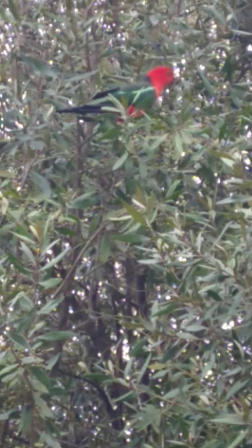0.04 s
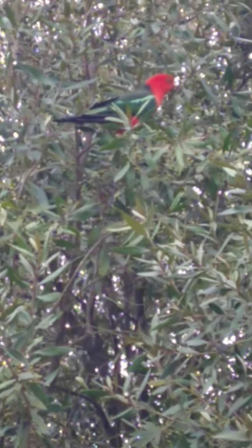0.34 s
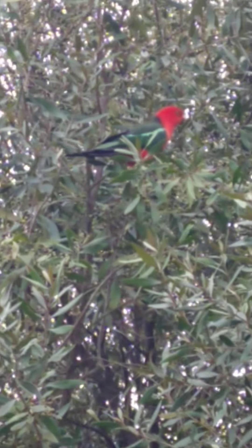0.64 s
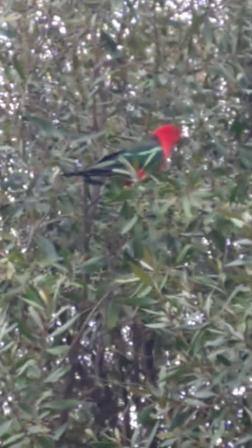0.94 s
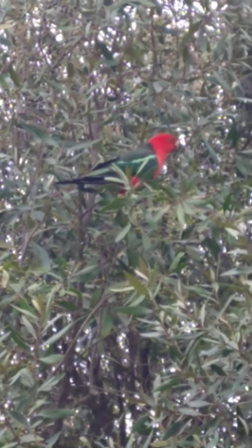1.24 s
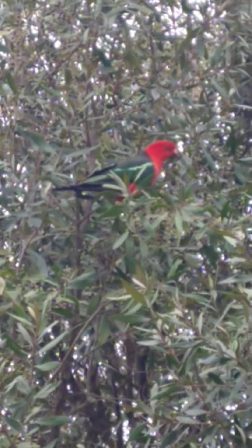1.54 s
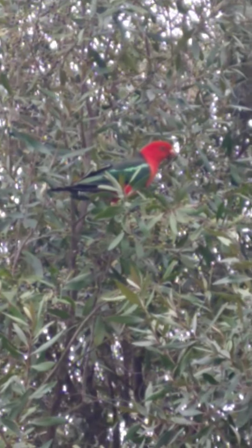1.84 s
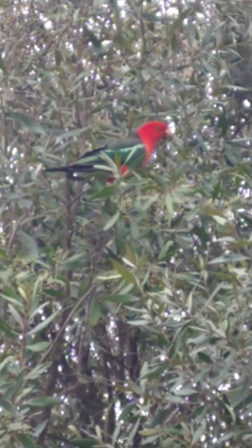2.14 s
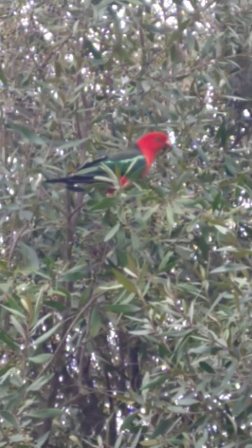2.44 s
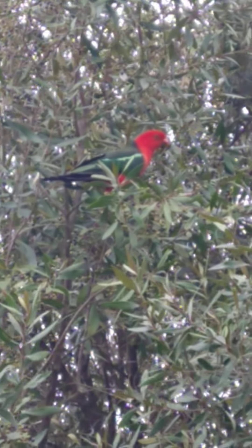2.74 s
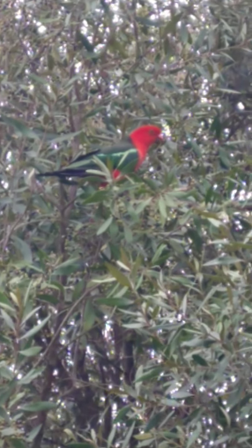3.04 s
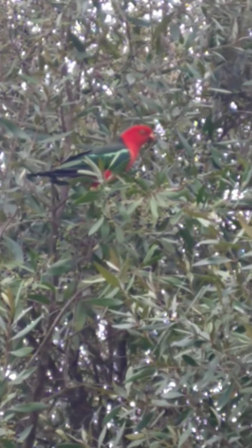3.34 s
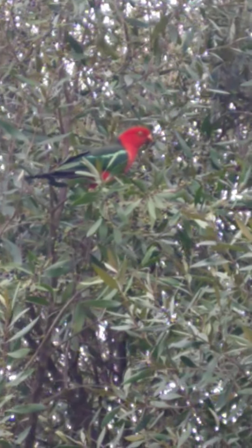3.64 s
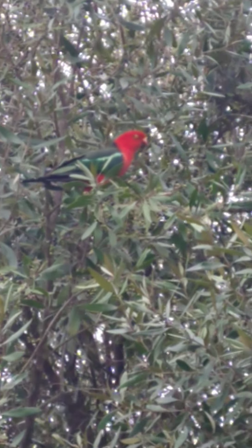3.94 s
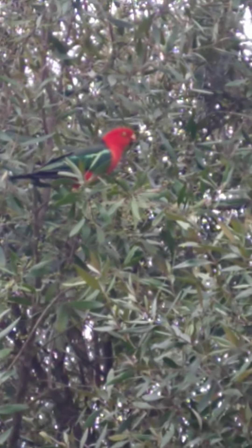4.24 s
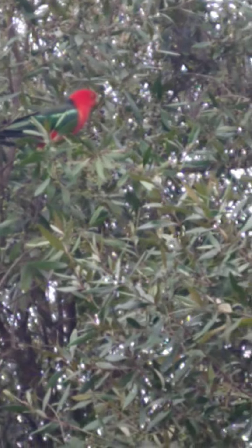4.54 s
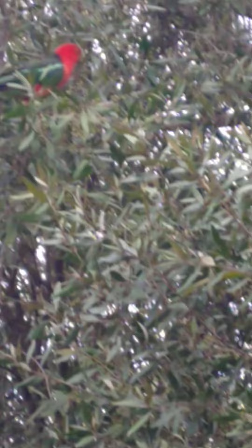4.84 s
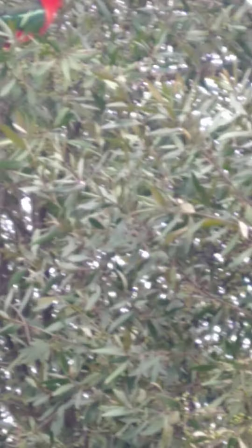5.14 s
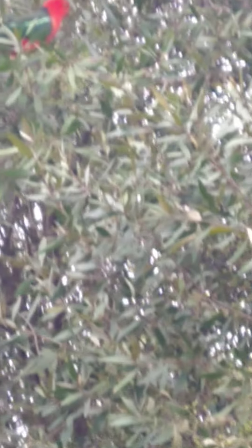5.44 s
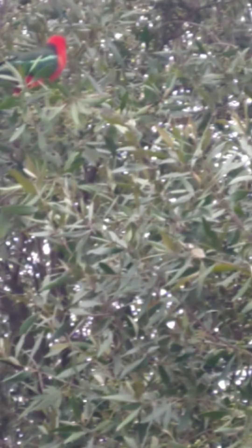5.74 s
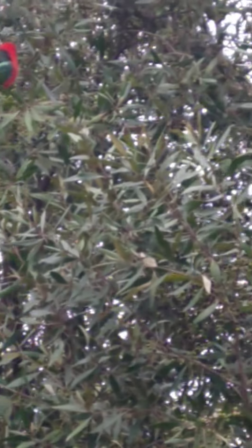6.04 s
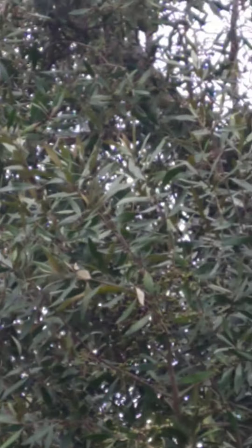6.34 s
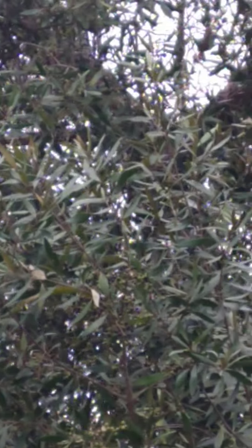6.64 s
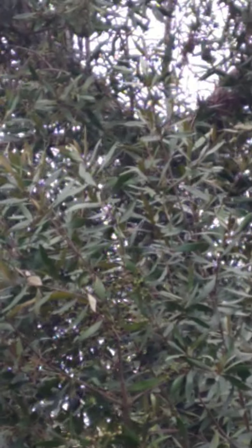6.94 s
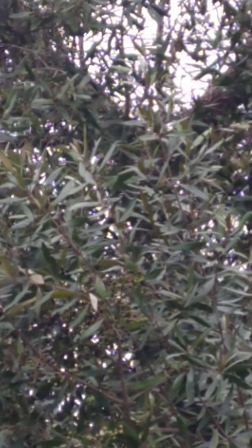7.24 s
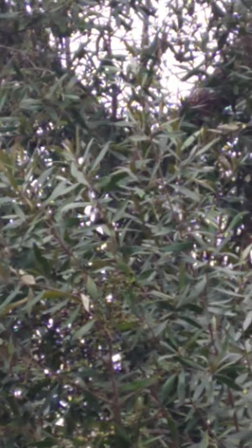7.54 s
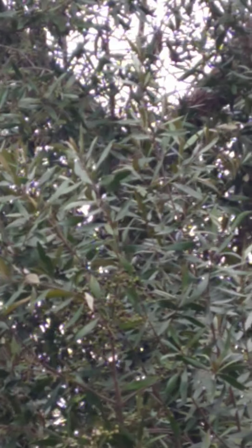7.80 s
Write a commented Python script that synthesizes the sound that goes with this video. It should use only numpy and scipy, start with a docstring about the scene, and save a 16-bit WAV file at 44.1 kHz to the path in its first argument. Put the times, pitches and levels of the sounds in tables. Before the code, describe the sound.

Distant engines drone and cars pass with a swelling tyre roar while parrots and small birds chirp faintly among rustling leaves.

```python
"""Among trees, some way from a road. From the start one engine hums, eases off once, then pulls steadily
up through its revs, while a second, raspier one drones and slowly fades. Leaves hiss, wind puffs, distant
birds echo faintly, and twigs snap now and then. Parrots soon chatter in short bouts. Tyre roar swells as
each car goes by, loudest near the end, when a small bird sets in with a thin, high trill."""
import sys
import numpy as np
from scipy import signal
from scipy.fft import rfft, irfft, next_fast_len
from scipy.io import wavfile
from scipy.ndimage import uniform_filter1d

SR = 44100
rng = np.random.default_rng(int(sys.argv[2]) if len(sys.argv) > 2 else 0)


def unload_wav(signal):
    """Save mono or channel-first audio to the path in sys.argv[1] as 16-bit WAV at rate SR, clipped to [-1, 1]."""
    wavfile.write(
        sys.argv[1],
        SR,
        np.round(np.clip(np.atleast_2d(signal).T, -1, 1) * 32767).astype(np.int16),
    )


N = 347067
TIME = np.arange(N) / SR
ROAD_LAG_S, BIRD_LAG_S = 0.00018, .00003  # how much later the left ear hears them


def from_db(db):
    """Turn decibels into a number to multiply a sound by."""
    return 10 ** (np.asarray(db) / 20)


def rms_one(x):
    """Scale a sound so that its average strength (rms) is 1."""
    return x / np.sqrt(np.mean(x ** 2) + 1e-20)


def in_time(rows):
    """Join the rows of a table with straight lines: one curve in time for each column after the first."""
    times, *columns = np.transpose(rows)
    return [np.interp(TIME, times, column) for column in columns]


def at_hz(points, hz):
    """Look up a table's value at any frequency."""
    table_hz, values = np.transpose(points)
    return np.interp(np.log(hz), np.log(table_hz), values)


def drift(rate_hz):
    """A smooth random wobble, about 1 in size."""
    step, warm_up = 40, 2000  # one value every 40 samples; the first 2000 values are skipped
    keep = np.exp(-2 * np.pi * step * rate_hz / SR)
    noise = rng.standard_normal(N // step + warm_up + 2)
    slow = signal.lfilter([1], [1, -2 * keep, keep * keep], noise)[warm_up:]
    return np.interp(np.arange(N) / step, np.arange(len(slow)), rms_one(slow))


def band(x, low_hz, high_hz):
    """Keep the part of a sound between two frequencies."""
    sos = signal.butter(2, [low_hz, min(high_hz, .45 * SR)], "band", fs=SR, output="sos")
    return signal.sosfilt(sos, x + 1e-18)


def from_right(x, lag_s):
    """Sound from the right reaches the left ear a little later."""
    left, right = np.broadcast_to(x, (2, N))
    return np.array([np.interp(TIME - lag_s, TIME, left), right])


def add(out, s, sound, pan_db):
    """Add a short sound at s seconds; a pan above zero makes it louder on the left."""
    at = round(s * SR)
    sound = sound[:max(N - at, 0)]
    out[:, at:at + len(sound)] += sound * from_db([[pan_db / 2], [-pan_db / 2]])


def surge(peak_s, db, rise_db_per_s, fall_db_per_s):
    """A volume curve that climbs to a peak and dies away."""
    return from_db(db - np.maximum((peak_s - TIME) * rise_db_per_s, (TIME - peak_s) * fall_db_per_s))


def together(gains):
    """Combine volume curves: unrelated sounds add in power, so add their squares."""
    return np.sqrt(sum(np.square(gain) for gain in gains))


def tone(hz, rough, flutter_hz):
    """A tone that follows a pitch curve; moving air and many paths make its level and phase wander."""
    phase = (2 * np.pi * ((np.cumsum(hz) / SR + rng.random()) % 1)).astype(np.float32)
    wavering = (1 + rough * drift(flutter_hz)) * np.cos(phase)
    return rms_one(wavering + rough * drift(flutter_hz) * np.sin(phase))


def climbing_engine():
    """Tones at multiples of the engine's speed; each booms as it crosses a pitch the exhaust rings at."""
    # turns of the crankshaft each second: t/s, f/Hz
    speed = [(0, 45.1), (.55, 46.6), (.72, 46.83), (1, 43.81), (1.3, 43.03), (2.5, 44.63), (3, 46.54),
             (3.5, 48.61), (3.95, 49.27), (4.4, 50.06), (4.9, 52.09), (6.4, 56.77), (7.2, 57.97),
             (7.87, 59.6)]
    # how well the strong tones get through the trees: t/s, level/dB
    carry = [(0, 7), (.7, 5), (1.7, 4.5), (3, -1), (5.5, 2.1), (7.2, -0.5), (7.5, -2.5), (7.87, -5.5)]
    # strong tones: multiple of the speed, level/dB
    strong_tones = [(2, -6), (3, -5.5), (4, 7.5), (6, 5.5), (8, -10)]
    # where the exhaust rings: f/Hz, width/Hz, level/dB
    exhaust = [(95.3, 21.5, -42), (134.1, 17.4, -45), (203.5, 13.45, -60), (242.3, 9.15, -47.5),
               (311, 21.4, -61), (345.9, 14.8, -43), (379.8, 21.5, -38)]
    # weak higher tones: multiple of the speed, level/dB
    weak_tones = [(5, -64.5), (5.5, -67.5), (6.5, -66), (7, -57), (9, -68)]
    crank_hz, = in_time(speed)
    carry_db, = in_time(carry)
    hum = 0
    for multiple, tone_db in strong_tones:
        hz = multiple * crank_hz
        boom = sum(from_db(db) / (1 + (2 * (hz - centre) / width) ** 2) for centre, width, db in exhaust)
        hum = hum + from_db(tone_db) * boom * tone(hz, rough=.14, flutter_hz=2.7)
    overtones = sum(from_db(db) * tone(k * crank_hz, rough=.5, flutter_hz=4.2) for k, db in weak_tones)
    return from_db(carry_db) * hum + overtones


def droning_engine():
    """A firing hum; swells bring up rough higher tones and gas puffs that ring in the silencer."""
    # crankshaft speed and the tones at 2 and 5 times it: t/s, f/Hz, firing level/dB, fifth level/dB
    drone = [(0, 42, -51, -52), (.7, 41.1, -49, -55), (1.2, 41.1, -49, -64), (2.3, 42.15, -51, -62),
             (3.6, 42.7, -53, -65), (5.4, 41, -60, -68), (6.3, 40.2, -54, -68), (7.87, 39, -59, -66)]
    # swells of the rasp: peak t/s, level/dB, rise/(dB/s), fall/(dB/s)
    swells = [(.02, -31, 1, 28.5), (.36, -41, 72, 18), (.72, -37.5, 63, 13), (2.27, -37.5, 37, 15.5),
              (2.7, -43, 70, 11), (3.32, -46.5, 35, 36), (6.6, -46.5, 18, 11.5)]
    # tones of the rasp: multiple of the speed, level/dB
    rasp_tones = [(7, -15), (8, -12), (9, -7), (10, -4.5), (11, -10.5), (12, -11), (14, -20.5)]
    # where the silencer rings: f/Hz, width/Hz, level/dB
    silencer = [(365, 36.4, 6.5), (405, 71, -5), (484, 28, 2.5)]
    crank_hz, firing_db, fifth_db = in_time(drone)
    swelling = together(surge(*one_swell) for one_swell in swells)
    # this clean tone throbs against the other engine's while the two are a few hertz apart
    firing = from_db(firing_db) * tone(2 * crank_hz, rough=.12, flutter_hz=4)
    fifth = from_db(fifth_db) * tone(5 * crank_hz, rough=.3, flutter_hz=4)
    rasp = sum(from_db(db) * tone(k * crank_hz, rough=.27, flutter_hz=5) for k, db in rasp_tones)
    pulsing = 1 + 1.02 * np.cos(4 * np.pi * np.cumsum(crank_hz) / SR)  # two puffs a turn
    puffs = rng.standard_normal(N) * pulsing
    gas = sum(from_db(db) * band(puffs, hz - width / 2, hz + width / 2) * (-1) ** k
              for k, (hz, width, db) in enumerate(silencer))
    return firing + fifth + swelling * (rasp + from_db(-4.5) * rms_one(gas))


def noise_line(hz, width_hz):
    """A narrow band of noise around a pitch curve, heard as a breathy hum."""
    lowpass = signal.butter(2, width_hz / 2, fs=SR, output="sos")
    smear = signal.sosfilt(lowpass, rng.standard_normal((2, N)))
    phase = (2 * np.pi * (np.cumsum(hz) / SR % 1)).astype(np.float32)
    return rms_one(smear[0] * np.cos(phase) + smear[1] * np.sin(phase))


def wash(spectrum, waver_db):
    """Wavering stereo noise, part straight from the road's side and part scattered by the trees."""
    # how alike the two ears hear it: f/Hz, likeness from 0 to 1
    likeness = [(40, .7), (150, 0.91), (400, .98), (700, 1), (1100, 0.85), (1600, 0.95), (2500, .85),
                (4000, .35), (8000, 0), (15000, 0.5)]
    size = next_fast_len(N)
    hz = np.maximum(np.arange(size // 2 + 1) * SR / size, 1)
    direct, *scattered = rfft(rng.standard_normal((3, size)))
    alike = np.clip(at_hz(likeness, hz), 0, .98)
    lag_phase = 2 * np.pi * hz * ROAD_LAG_S
    ears = np.sqrt(alike) * direct * np.exp(-1j * lag_phase * [[1], [0]])
    ears += np.sqrt(1 - alike) * np.array(scattered)
    fade_ends = 1 / (1 + (spectrum[0][0] / hz) ** 4) / (1 + (hz / spectrum[-1][0]) ** 8)
    overlap = np.sqrt(1 + alike * np.cos(lag_phase))  # how the two ears add up or cancel when mixed
    noise = irfft(ears * fade_ends * from_db(at_hz(spectrum, hz)) / overlap, size)[:, :N]
    return noise / np.std(noise.mean(axis=0)) * from_db(waver_db * drift(10.0))


def road():
    """Traffic rumbles and tyres whine; each passing car swells the roar and adds the hum of its tread."""
    # passing cars: nearest t/s, half length/s, hum f/Hz, hum level/dB, roar level/dB, edge level/dB
    cars = [(.85, 0.79, 938, -54, -70, -74), (2.453, 0.65, 984, -59, -59.5, -70),
            (3.45, 0.36, 1000, -55, -57.5, -61), (4.1, 0.4, 1530, -60, -60, -53.5),
            (5.15, 0.7, 1258, -53, -52.5, -57.5), (6.75, 0.73, 1113, -53, -48.5, -50),
            (7.87, 0.088, 1092, -54, -66, -74)]
    # tyre whine: t/s, f/Hz, level/dB
    whine_curve = [(0, 770, -87), (3.3, 775, -60), (5.5, 771, -52), (6, 791, -45), (7.1, 781.4, -48),
                   (7.5, 763, -57)]
    # tone colours of the tyre roar, its bright edge and the low rumble: f/Hz, relative level/dB
    roar_colour = [(500, -34), (720, -6), (900, 3), (1150, 1), (1400, -8), (1700, -30), (2300, -38)]
    edge_colour = [(950, -39.5), (1250, -1.5), (1480, -0.5), (1720, -5), (1950, -16.5), (2250, -29),
                   (3000, -34)]
    rumble_colour = [(25, -34.5), (40, -12), (60, -2), (80, -1), (120, -2), (170, -7.5), (250, -7),
                     (350, 2), (480, -3.5), (600, -5), (800, -7.5), (1000, -14), (1400, -45.5)]
    rumble_db, far_roar_db, far_edge_db = -45.5, -59, -64  # steady traffic behind the passing cars
    roar_gains, edge_gains, tread = [from_db(far_roar_db)], [from_db(far_edge_db)], 0
    for s, half_s, hum_hz, hum_db, roar_db, edge_db in cars:
        nearness = np.exp(-.5 * ((TIME - s) / half_s) ** 2)
        roar_gains.append(from_db(roar_db) * nearness)
        edge_gains.append(from_db(edge_db) * nearness)
        tread = tread + from_db(hum_db) * nearness * noise_line(np.full(N, hum_hz), width_hz=142)
    whine_hz, whine_db = in_time(whine_curve)
    whine = from_db(-2.5) * noise_line(whine_hz, width_hz=56.0)
    whine += from_db(-9.5) * tone(whine_hz - 9, rough=0.15, flutter_hz=2.7)
    roar = together(roar_gains) * wash(roar_colour, waver_db=0.93)
    edge = together(edge_gains) * wash(edge_colour, waver_db=-0.3)
    rumble = from_db(rumble_db) * wash(rumble_colour, waver_db=0.57)
    return rumble + roar + edge + from_right(tread + from_db(whine_db) * whine, ROAD_LAG_S)


def breeze():
    """Rustling leaves, a faint high hiss, and low puffs of wind on each side of the microphone."""
    # loudness of the leaves: t/s, level/dB
    leaf_level = [(0, -67.5), (3.4, -68), (4.05, -64), (4.6, -69), (6, -69.5), (7.2, -76)]
    # tone colours of the leaves and the high hiss: f/Hz, relative level/dB
    leaf_colour = [(1120, -29.5), (1900, -2.5), (2140, -7), (2350, -7.5), (3120, -10.5), (3480, -14),
                   (4030, -12.5), (5810, -22.5), (7000, -21), (9100, -56), (15400, -120)]
    hiss_colour = [(3240, -34.5), (5500, -6), (6570, -8), (7200, -4.5), (7690, -2.5), (8350, -5.5),
                   (9070, -4), (11100, -15), (15600, -15.5)]
    # puffs of wind: peak t/s, level/dB
    puffs = [(.05, -45), (3.87, -44.5), (4.9, -39.5), (5.02, -44), (5.22, -45.5), (6.42, -62), (7.54, -53)]
    leaf_db, = in_time(leaf_level)
    leaves = from_db(leaf_db) * wash(leaf_colour, waver_db=1.0)
    hiss = from_db(-76.5) * wash(hiss_colour, waver_db=0.45) * from_db([[.8], [-.8]])
    wind = together(surge(s, db, rise_db_per_s=131, fall_db_per_s=65) for s, db in puffs)
    return leaves + hiss + wind * rms_one(band(rng.standard_normal((2, N)), 68, 130))


def chirp(length_s, start_hz, middle_hz, end_hz, overtone_db, quaver):
    """A bird's glide through three pitches, with two overtones; pitch and strength tremble together."""
    progress = np.linspace(0, 1, max(int(length_s * SR), 64))
    tremble = rms_one(uniform_filter1d(rng.standard_normal(len(progress)), size=60))
    glide_hz = np.polyval(np.polyfit([0, .5, 1], [start_hz, middle_hz, end_hz], 2), progress)
    phase = 2 * np.pi * np.cumsum(glide_hz * (1 + quaver * tremble)) / SR
    third_db = overtone_db + 1 - max(3 * middle_hz - 7200, 0) / 40  # the throat passes little over 7 kHz
    overtones = from_db(overtone_db) * np.sin(2 * phase) + from_db(third_db) * np.sin(3 * phase)
    swell = np.sqrt(4 * progress * (1 - progress))
    return (np.sin(phase) + overtones) * (1 + .3 * tremble) * swell


def trees(x, fade_s):
    """Countless small echoes off trunks and leaves, different for each ear, falling 60 dB in fade_s."""
    t = np.arange(SR) / SR
    echoes = rng.standard_normal((2, SR)) * from_db(-60 * t / fade_s) * (1 - np.exp(-t / 0.0024))
    return signal.fftconvolve(x, echoes / np.sqrt(np.sum(echoes ** 2) / 2), axes=1)[:, :N]


def far_birds():
    """Distant birds call at random pitches, and only their echoes get through the leaves."""
    # bouts of chatter: start t/s, end t/s, f/Hz, spread as a share of the pitch, level/dB
    bouts = [(0, 1.101, 3806, .15, -66), (.45, 1.4, 5170, .11, -68.5), (1.15, 1.45, 2735, .025, -71.5),
             (2.999, 4.301, 3086, .14, -66.5), (3.802, 5.15, 4552, 0.093, -68.5),
             (4.802, 5.707, 4850, 0.097, -79), (5.548, 6.799, 2977, 0.038, -71.5), (6, 7.6, 2750, .14, -69)]
    notes = np.zeros((2, N))
    for start, end, hz, spread, db in bouts:
        chance = rng.uniform(-1.1, 1, size=(32, 3))
        for s, (late, pitch, glide) in zip(np.linspace(start, end, len(chance)), chance):
            middle_hz = hz * (1 + spread * pitch)
            start_hz, end_hz = middle_hz * (1 - spread * glide), middle_hz * (1 + spread * glide)
            note = chirp(.05, start_hz, middle_hz, end_hz, overtone_db=-46, quaver=0.015)
            add(notes, max(s + .02 * late, 0), from_db(db) * note, pan_db=-6.0)
    return trees(notes, fade_s=1.1)


def twigs():
    """Each twig breaks with a very short, bright crack; its brief spray of echoes is duller."""
    # snapping twigs: t/s, level/dB, top edge f/Hz
    snaps = [(.181, -48, 9400), (.211, -47, 9450), (.2355, -48, 9500), (.2495, -49, 9800),
             (.27, -59, 15000), (1.4548, -38, 14000), (1.459, -39, 9780), (2.0114, -48, 13420),
             (2.7845, -58, 11000), (5.3438, -55.5, 12060), (6.1, -61, 13050), (6.14, -57, 11980),
             (7.4207, -61, 9995)]
    thick_twig_db = -40  # thick twigs snap loudly and knock too; thinner ones lose the knock
    cracks, t = np.zeros((2, N)), np.arange(SR // 20) / SR
    for s, db, top_hz in snaps:
        burst = rng.standard_normal(len(t)) * np.exp(-t / 0.0019)
        knock = from_db(0.3 * (db - thick_twig_db)) * band(burst, 3160, 4000)
        crack = band(burst, 6630, top_hz) + knock
        add(cracks, s, from_db(db) * crack / np.abs(crack).max(), pan_db=5.5)
    return cracks + from_db(-1.5) * trees(band(cracks, 3000, 11000), fade_s=0.29)


def parrot_note(length_s, hz, glide_octaves):
    """One quavering glide; low notes are reedy, high ones pure."""
    reedy_hz, reedy_db, db_per_octave = 2670, -10, -24  # overtone level at one pitch, and its fall
    overtone_db = min(reedy_db + db_per_octave * np.log2(hz / reedy_hz), 0)
    step = 2 ** (glide_octaves / 2)
    return chirp(length_s, hz / step, hz, hz * step, overtone_db, quaver=0.015)


def parrots():
    """Chatter that lingers among the trees, and drier chips close by; leaves soak up the echoes' top."""
    # parrots on the right: t/s, length/s, f/Hz, glide/octaves, level/dB
    chatter = [(0.728, .069, 2750, -.12, -62), (0.797, .13, 2710, 0.069, -67),
               (1.048, 0.021, 3680, -0.13, -62), (1.091, .025, 3200, -.11, -60),
               (1.143, 0.019, 3640, 0.073, -50.5), (1.186, 0.11, 2700, .1, -62),
               (2.735, 0.028, 3750, -0.22, -65.5), (2.745, .022, 2420, -.09, -65),
               (2.775, 0.047, 4170, .18, -67), (2.84, 0.026, 4370, -.04, -60), (2.86, .04, 3120, .17, -64),
               (2.915, 0.03, 4360, -.06, -63), (2.946, .053, 3040, -.24, -63.5),
               (3.784, .034, 3440, 0.22, -61), (3.848, 0.05, 2550, 0.1, -59),
               (4.564, 0.021, 2380, 0.068, -64), (4.577, 0.029, 4030, -.08, -58),
               (4.595, 0.021, 2650, 0.0027, -61), (4.626, 0.027, 3640, -.04, -62),
               (4.665, 0.086, 2910, 0.062, -58), (7.125, 0.055, 4760, .03, -69),
               (7.175, .027, 5170, .03, -66), (7.2, .053, 2730, 0.115, -69.5)]
    # sharp falling chips of a nearer parrot on the left: t/s, length/s, f/Hz, relative level/dB
    chips = [(1.164, .04, 5650, -61), (4.01, .022, 3400, -65), (4.021, 0.026, 2330, -62),
             (4.274, .025, 2300, -60.5)]
    far, near = np.zeros((2, 2, N))
    for s, length_s, hz, glide_octaves, db in chatter:
        add(far, s, from_db(db) * parrot_note(length_s, hz, glide_octaves), pan_db=-2.5)
    for s, length_s, hz, db in chips:
        add(near, s, from_db(db) * parrot_note(length_s, hz, glide_octaves=-0.21), pan_db=4.5)
    echoes = trees(band(far + from_db(-7.5) * near, 1500, 7200), fade_s=0.89)
    return from_right(far + from_db(4.5) * near, BIRD_LAG_S) + from_db(-0.5) * echoes


def trill():
    """A small bird repeats one falling pip about eighteen times a second, softly at first."""
    start_s, step_s, swell_s = 6.224, .05466, .65
    full_db, soft_start_db = -68, -7
    pips = np.zeros((2, N))
    for s in np.arange(start_s, N / SR, step_s):
        db = full_db + soft_start_db * max(1 - (s - start_s) / swell_s, 0) + rng.normal(0, 1)
        pip = chirp(.022, 6800, 6740, 6600, overtone_db=-60, quaver=.007)
        add(pips, s, from_db(db) * pip, pan_db=8)
    return pips + from_db(-2.5) * trees(pips, fade_s=.5)


def scene():
    """Mix the traffic, a little to the right, with the breeze, birds and twigs."""
    engines = from_right(climbing_engine() + droning_engine(), ROAD_LAG_S)
    traffic = (engines + road()) * from_db([[-.5], [.5]])
    return traffic + breeze() + parrots() + far_birds() + trill() + twigs()


def record(dry):
    """Cut off the very highest treble steeply."""
    cutoff_hz = 15700
    return signal.sosfilt(signal.ellip(12, .1, 80, cutoff_hz, fs=SR, output="sos"), dry)


dry = scene()
out = record(dry)
unload_wav(out)
```